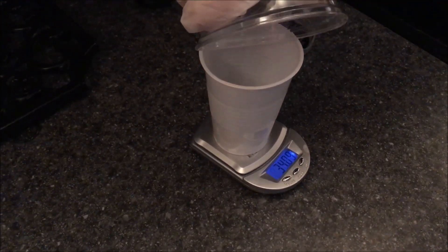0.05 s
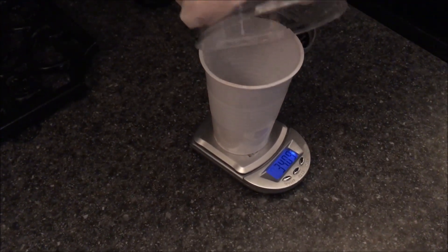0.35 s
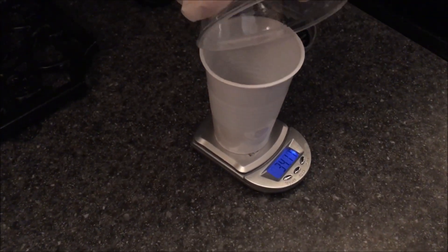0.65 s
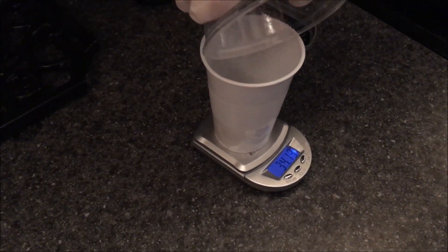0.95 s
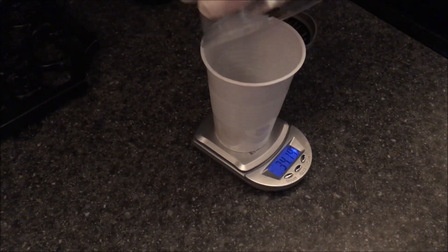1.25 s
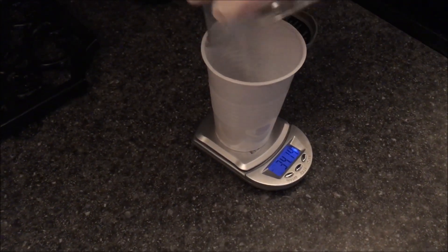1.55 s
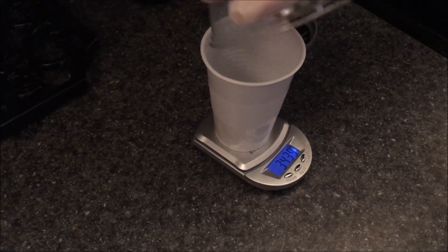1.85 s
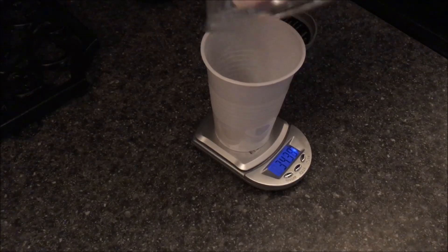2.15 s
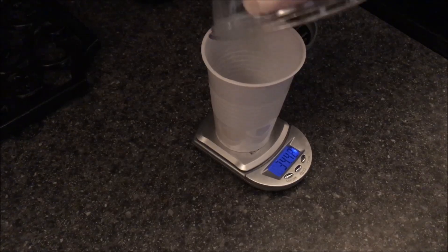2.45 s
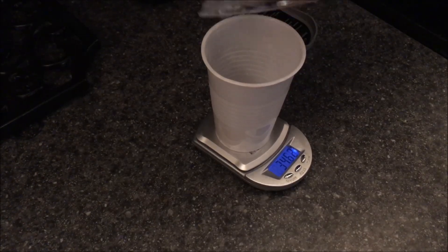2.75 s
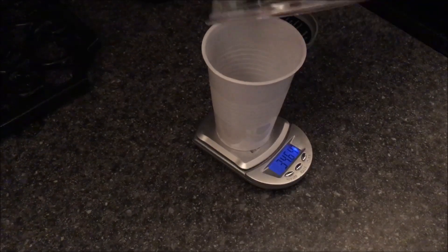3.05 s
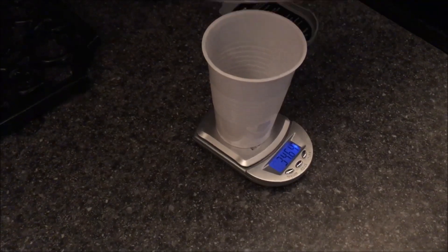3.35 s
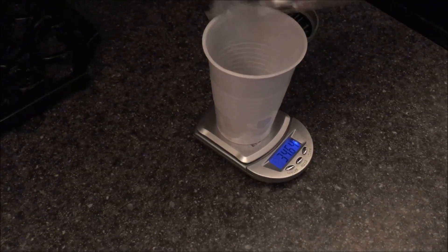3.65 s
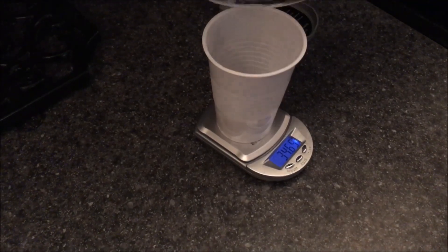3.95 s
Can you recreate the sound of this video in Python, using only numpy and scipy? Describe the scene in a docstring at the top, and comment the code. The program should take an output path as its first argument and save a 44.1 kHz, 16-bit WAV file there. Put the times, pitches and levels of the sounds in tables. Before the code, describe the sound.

Irregular clicks of a plastic container against a cup, with faint sliding grains and appliance hum.

```python
"""A small kitchen, one microphone close to a plastic cup on a scale, an appliance humming behind it.
A little fine, dry material is tipped into the cup from a clear plastic container. The thin plastic
ticks as the two touch, crackles as the dragging rim sticks and slips, and rings faintly when rubbed.
The grains slide with a soft hiss of tiny impacts. Counter and walls add short, faint reflections."""
import sys
import numpy as np
from scipy import signal
from scipy.fft import rfft, irfft
from scipy.io import wavfile

SR = 44100
rng = np.random.default_rng(int(sys.argv[2]) if len(sys.argv) > 2 else 0)


def digitize_waveform(pressure):
    """Quantize a signal to 16-bit integers and store it at the path in sys.argv[1].

    Rows of a 2-D input are taken as channels; values are limited to [-1, 1].
    """
    field = np.atleast_2d(pressure).T
    bounded = np.clip(field, -1, 1)
    quanta = np.round(bounded * 32767).astype(np.int16)
    wavfile.write(sys.argv[1], SR, quanta)


N = 176400
T = np.arange(N) / SR

# Motor tones of the appliance: pitch_hz, rms_db
HUM_TONES = [(59, -61.5), (82, -63.5), (106, -57.5), (159, -53), (212, -57.5), (237, -68), (245.8, -61.5),
             (346, -70.5), (355.3, -72), (474, -78.5), (1125.5, -80.5), (1481, -94), (2782, -101),
             (2842, -105), (2902, -96.5), (2962, -96), (3021, -102.5), (3080, -90)]
# Rumble and air of the room: frequency_hz, relative_db
AIR_SPECTRUM = [(15, -40), (30, -5), (42, -11), (54, -3.5), (72, 0), (96, 3.5), (115, 0), (133, -6.5),
                (153, 5.5), (170, -1.5), (186, -7.5), (202, -3), (218, -4.5), (235, -3), (260, -9.5),
                (305, -10.5), (328, -8.5), (355, -4.5), (385, -13.5), (440, -14.5), (520, -20), (750, -21),
                (920, -27), (1010, -21.5), (1100, -26.5), (1280, -23.5), (1650, -28.5), (2100, -33.5),
                (2720, -40), (3150, -39), (3600, -41), (4200, -41), (5000, -47), (5900, -45.5),
                (7500, -50.5), (9500, -45), (10400, -52), (11500, -45.5), (16000, -50)]
# Light rubs on the cup wall: centre_s, half_length_s, level_db, resonance_hz, half_width_hz
WALL_RUBS = [(.345, 0.0091, -72.5, 6700, 500), (0.41, 0.012, -69, 6200, 350),
             (0.846, 0.015, -70, 6300, 250), (1.47, 0.032, -76, 5600, 1200), (1.626, 0.014, -71, 5800, 400),
             (2.1, .03, -74, 4350, 900), (2.21, 0.0088, -73, 4770, 1200), (2.643, .012, -78, 5500, 1200),
             (2.86, .03, -74, 5740, 900), (3.884, 0.011, -71.5, 4620, 1300)]
# Rise and fall of the sliding hiss: time_s, level_db
SLIDE_LEVELS = [(0, -71), (.27, -79.5), (.42, -76), (.62, -77.5), (.71, -82), (.75, -70.5), (.88, -75),
                (1.22, -77), (1.37, -70), (1.62, -72.5), (1.83, -76), (2.14, -71), (2.42, -77), (2.74, -80),
                (2.87, -77.5), (3.08, -76.5), (3.25, -82.5), (4, -79.5)]
# Tone of the sliding grains: frequency_hz, relative_db
SLIDE_SPECTRUM = [(1000, -15.5), (2600, -11.5), (3200, -2.5), (4300, 1.5), (4900, -2.5), (5700, 4),
                  (6450, 2), (7200, -0.5), (9000, -4.5), (10500, -9.5), (16000, -14)]
# Ringing of the cup wall: pitch_hz, relative_db, t60_s
CUP_MODES = [(3550, -18.5, 0.018), (4190, -29.5, 0.06), (5380, -20.5, 0.014), (6240, -21.5, 0.028),
             (6370, -20.5, 0.029), (6630, -18.5, 0.011), (7430, -20, 0.0092), (8700, -17.5, 0.017),
             (10000, -25, .012), (11430, -22, 0.0077)]
# Drags of the rim: start_s, length_s, level_db, change_over_length_db
RIM_DRAGS = [(0.068, 0.047, -70, -4), (0.478, .045, -65, -11), (.918, 0.041, -61.5, -1),
             (0.965, 0.055, -59.5, 1), (1.024, 0.033, -61, -1.5), (1.06, 0.084, -72.5, -5),
             (1.328, 0.068, -65, -6), (1.551, 0.037, -51.5, -6), (1.59, 0.048, -63, -15),
             (1.695, .025, -67, -7), (2.278, 0.062, -65.5, -3), (2.452, 0.078, -70.5, -10),
             (2.832, .025, -67, -12), (2.923, 0.037, -63, -10.5), (2.967, .035, -57.5, -11.5),
             (3.965, .032, -68, -4)]
# Tone of the crackling plastic: frequency_hz, relative_db
CRACKLE_SPECTRUM = [(300, -11), (1500, -10), (2700, -20), (3600, -6.5), (5000, -5), (6400, -2.5),
                    (7700, .5), (9400, 2.5), (10500, -3), (12500, -5), (14000, -8), (16000, -10)]
# Container touching cup: start_s, relative_db, treble_db, body_db
CONTACT_TICKS = [(0.0231, -52, -3, -5), (0.0665, -48, -10, -7), (0.0798, -58, 1, 3), (0.0835, -58, 2, -4),
                 (0.0947, -60, -4, -7), (0.1278, -61.5, -1, 1), (0.1423, -64, -1, 2), (0.1912, -45.5, 3, 3),
                 (0.4693, -62, -5, -1), (0.4758, -44.5, 4, -0.5), (0.4993, -55.5, -4, -11),
                 (0.5192, -60, -5, -6), (0.5655, -65, -2, -5), (0.5875, -59.5, -3, -11),
                 (0.6543, -57.5, 0, -2), (0.6645, -57, -1, -1), (0.704, -63.5, 4, -7),
                 (0.735, -62.5, -6, 0), (0.7778, -64, -4, 0), (0.915, -58, -11, -1),
                 (0.9211, -51.5, 0, -0.5), (0.934, -51, -3, 0), (0.9758, -55, -4, 2), (1.0106, -59, 1, -2),
                 (1.0652, -59, -1, -2), (1.0876, -60.5, 3, -5), (1.2232, -61, 0, 1),
                 (1.2538, -54.5, -7, -6), (1.2686, -60.5, -4, -3), (1.3015, -61, -18, 1),
                 (1.328, -57, -8, -8), (1.5357, -61, 3, 6), (1.5465, -53, -1, 3), (1.551, -52, 2, 6),
                 (1.5738, -50, -3, 2), (1.6992, -59, -2, 1), (1.7143, -64, -3, -5), (1.7352, -57, 1, -4),
                 (1.741, -60, -1, -2), (1.7704, -65, 1, 4), (1.8998, -71, 3, 5), (2.0149, -68, 4, 1),
                 (2.1602, -61.5, -1, 0), (2.2481, -58, 4, -5), (2.279, -60.5, 5, -2), (2.2819, -55.5, 2, 9),
                 (2.299, -61, 0, 3), (2.5217, -69, 5, -3), (2.7883, -68.5, -10, 1), (2.826, -64.5, 1, 3),
                 (2.8668, -69, -6, 2), (2.8836, -55, -1, -1), (2.9234, -62, -1, -1), (2.939, -59, 6, 4),
                 (2.9641, -50.5, -2, -12), (2.972, -52, -3, 2.5), (3.0485, -60.5, 3, -6),
                 (3.502, -71, -6, -7), (3.6356, -69.5, -9, 2), (3.6656, -71, -2, -2), (3.7004, -73, -16, 2),
                 (3.9693, -62, 0, -5), (3.9725, -61, 0, -6), (3.9869, -68, -1, 4)]
# Tone of a tick in thin plastic: frequency_hz, relative_db
TICK_SPECTRUM = [(300, -38), (1200, -12), (2700, -17.5), (3400, -13), (4100, -6.5), (5100, -4.5),
                 (6400, -3.5), (7800, 0), (9000, -2.5), (10500, -1.5), (12500, -3), (14000, -7),
                 (16000, -13)]


def amp(db):
    """Decibels to gain."""
    return 10 ** (np.asarray(db) / 20)


def unit(x):
    """Scales to rms 1."""
    return x / np.sqrt(np.mean(x ** 2) + 1e-20)


def add(mix, start_s, sound):
    """Mixes a sound in at start_s."""
    part = mix[max(round(start_s * SR), 0):][:len(sound)]
    part += sound[:len(part)]


def spectrum_db(hz, spectrum):
    """Level of a spectrum at hz, interpolated over log frequency."""
    points_hz, points_db = np.transpose(spectrum)
    return np.interp(np.log(hz + 1), np.log(points_hz), points_db)


def colour(x, spectrum, treble_db=0, body_db=0, size=1024):
    """Minimum-phase filter of the given spectrum, with shelves on the treble and the body."""
    hz = abs(np.fft.fftfreq(size, 1 / SR))
    shelves_db = np.interp(hz, [4600, 6000, 7500, 10500], [body_db, 0, 0, treble_db])
    log_gain = np.log(amp(spectrum_db(hz, spectrum) + shelves_db))
    taps = np.fft.ifft(np.exp(np.conj(signal.hilbert(log_gain)))).real
    return signal.fftconvolve(x, taps[:size // 2])[:len(x)]


def noise(gain):
    """Steady noise whose spectrum is gain(hz)."""
    hz = np.fft.rfftfreq(N, 1 / SR)
    return unit(irfft(rfft(rng.standard_normal(N)) * gain(hz), N))


def appliance(air_db=-51.5):
    """Behind the cup: steady motor tones over the rumble and air of the room."""
    air = noise(lambda hz: amp(spectrum_db(hz, AIR_SPECTRUM)))
    tones = sum(amp(rms_db) * np.sqrt(2) * np.sin(2 * np.pi * (hz * T + rng.random()))
                for hz, rms_db in HUM_TONES)
    return amp(air_db) * air + tones


def room(direct, t60_s=0.21, level_db=-15, delay_s=0.004):
    """Sparse reflections from counter and walls reach the microphone just after the direct sound."""
    t = T[:SR // 2]
    echoes = rng.standard_normal(len(t)) * (rng.random(len(t)) < 0.08)
    tail = echoes * (t > delay_s) * amp(-60 * t / t60_s)
    return direct + amp(level_db) * signal.fftconvolve(direct, tail / np.linalg.norm(tail))[:N]


def wall_rubs():
    """Light friction excites a resonance of the cup wall, which depends on where it is touched."""
    out = np.zeros(N)
    for centre_s, half_length_s, level_db, resonance_hz, half_width_hz in WALL_RUBS:
        swell = np.exp(-((T - centre_s) / half_length_s) ** 2 / 2)
        friction = noise(lambda hz: 1 / (1 + ((hz - resonance_hz) / half_width_hz) ** 2))
        out += amp(level_db) * swell * friction
    return out


def impacts(per_s, spread_db):
    """Tiny impacts at random times, a few stronger than the rest."""
    strength = amp(spread_db * np.minimum(rng.exponential(1, N), 3))
    return strength * rng.choice([-1, 1], N) * (rng.random(N) < per_s / SR)


def snap(flutter_db, ring_db, crack_s=0.00021, flutter_s=0.0029, size=1500):
    """Thin plastic snaps: a sharp crack, a flutter of the wall, and cup modes detuned as it flexes."""
    t = np.arange(size) / SR
    crack = rng.standard_normal(size) * np.exp(-t / crack_s)
    flutter = rng.standard_normal(size) * np.exp(-t / flutter_s)
    out = 2 * crack / np.linalg.norm(crack) + amp(flutter_db) * flutter
    for hz, mode_db, t60_s in CUP_MODES:
        decay = amp(ring_db + mode_db - 60 * t / t60_s) * rng.uniform(0, 2)
        detuned_hz = hz * rng.normal(1, 0.03)
        out += decay * np.sin(2 * np.pi * (detuned_hz * t + rng.random()))
    return out


def crackle(per_s, spread_db, spots):
    """A random run of short, dry snaps from several spots on the plastic, each with its own sound."""
    snaps = np.zeros(N)
    for _ in range(spots):
        hits = impacts(per_s / spots, spread_db)
        snaps += signal.oaconvolve(hits, unit(snap(flutter_db=-19, ring_db=-9)))[:N]
    return unit(colour(snaps, CRACKLE_SPECTRUM))


def sliding_grains(stray_db=-8.5):
    """Fine grains hiss down the container; a few stray ones tick against the plastic."""
    hiss = unit(colour(impacts(per_s=7000, spread_db=4.5), SLIDE_SPECTRUM))
    strays = crackle(per_s=60, spread_db=1, spots=6)
    flow = amp(np.interp(T, *np.transpose(SLIDE_LEVELS)))
    return flow * (hiss + amp(stray_db) * strays)


def rim_drags(attack_s=0.0022, release_s=0.0022):
    """The rim sticks and slips in quick runs of tiny snaps."""
    envelope = np.zeros(N)
    for start_s, length_s, level_db, change_db in RIM_DRAGS:
        t = T - start_s
        attack = np.clip(t / attack_s, 0, 1)
        level = amp(level_db + change_db * np.clip(t / length_s, 0, 1))
        release = np.exp(-np.maximum(t - length_s, 0) / release_s)
        envelope += attack * level * release
    return envelope * crackle(per_s=1600, spread_db=3, spots=40)


def contact_ticks(gain_db=21.5, treble_trim_db=-0.5):
    """Right at the microphone: single snaps as container and cup touch and flex."""
    out = np.zeros(N)
    for start_s, relative_db, treble_db, body_db in CONTACT_TICKS:
        tick = snap(flutter_db=-13, ring_db=-3.5)
        tick = colour(tick, TICK_SPECTRUM, treble_db + treble_trim_db, body_db)
        add(out, start_s, amp(relative_db + gain_db) * tick / np.linalg.norm(tick))
    return out


def scene():
    """The pouring close up, the hum behind it, in mono."""
    background = appliance()
    pouring = contact_ticks() + rim_drags() + sliding_grains() + wall_rubs()
    return (background + room(pouring))[None]


def record(dry):
    """The recorder's band limit takes off the highest treble."""
    lowpass = signal.firwin(401, cutoff=15950, window=("kaiser", 8), fs=SR)
    return signal.oaconvolve(dry, lowpass[None], "same")


dry = scene()
out = record(dry)
digitize_waveform(out)
```